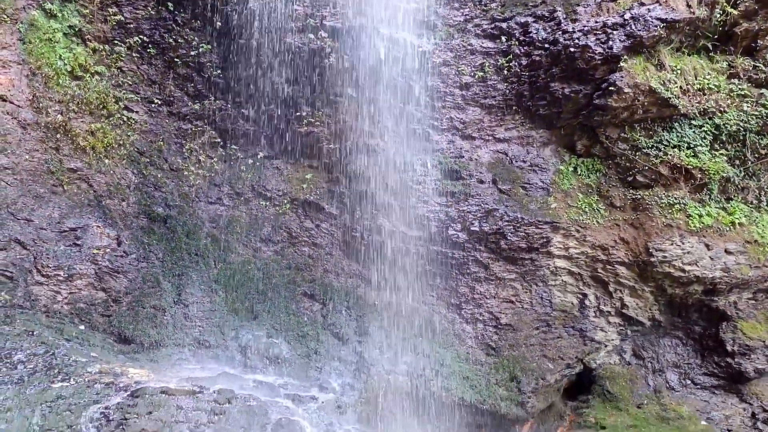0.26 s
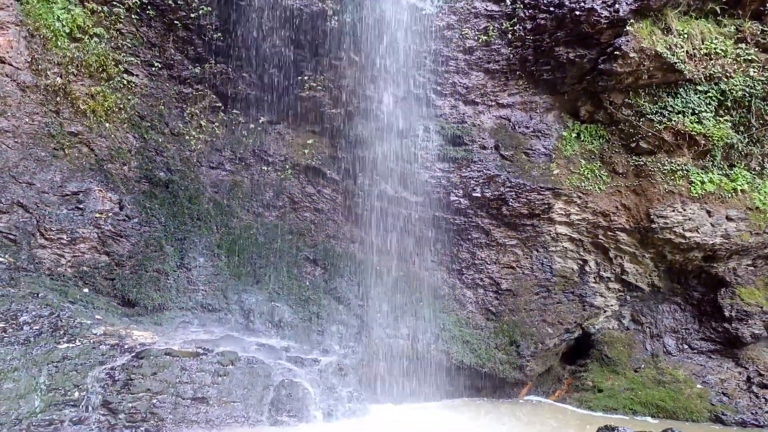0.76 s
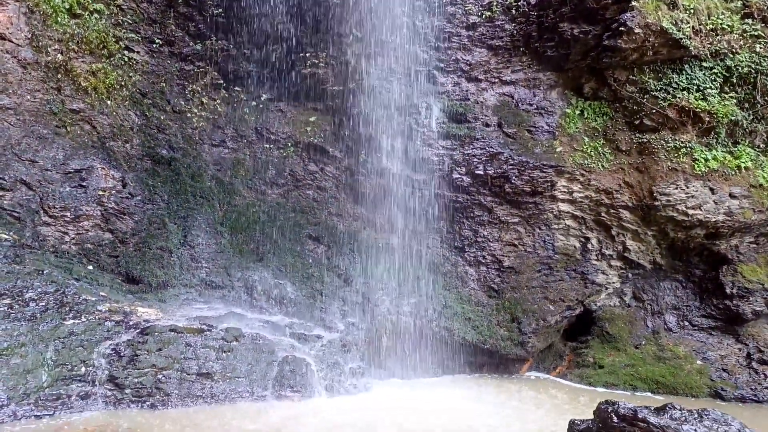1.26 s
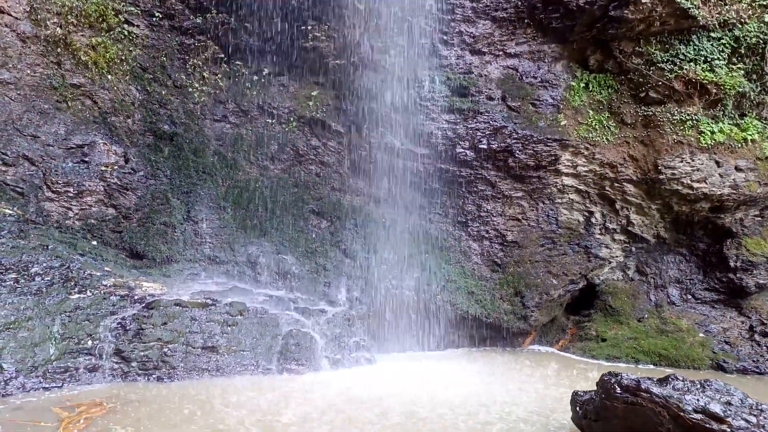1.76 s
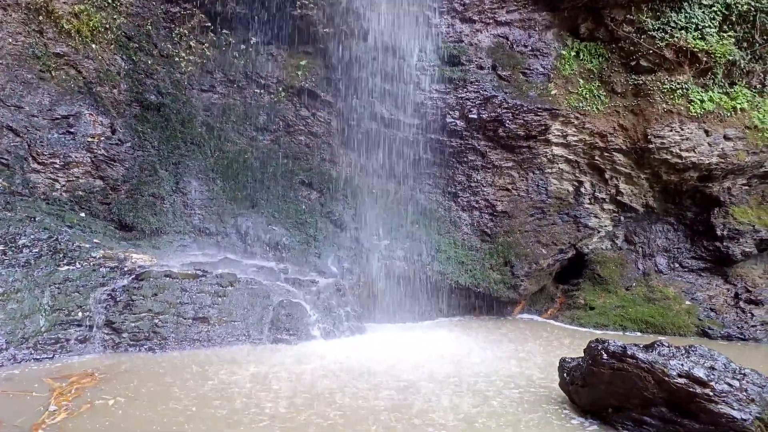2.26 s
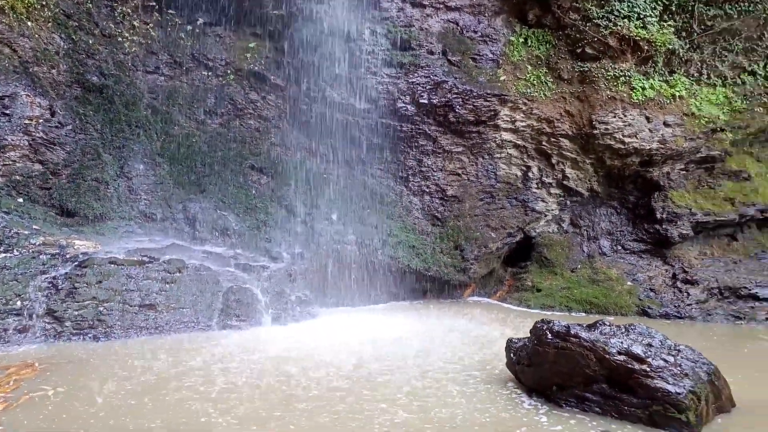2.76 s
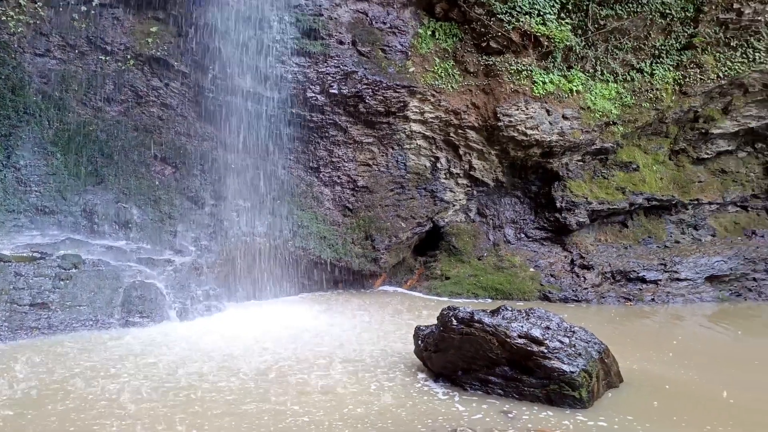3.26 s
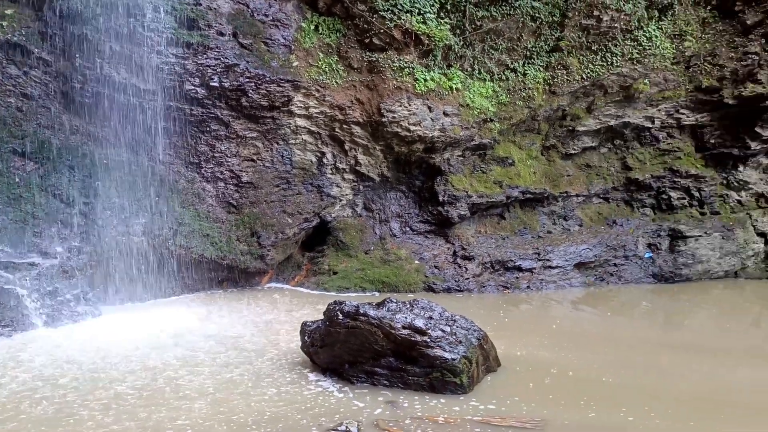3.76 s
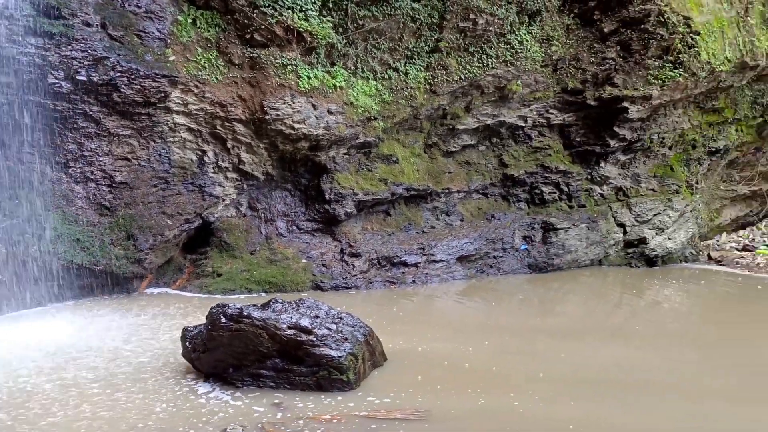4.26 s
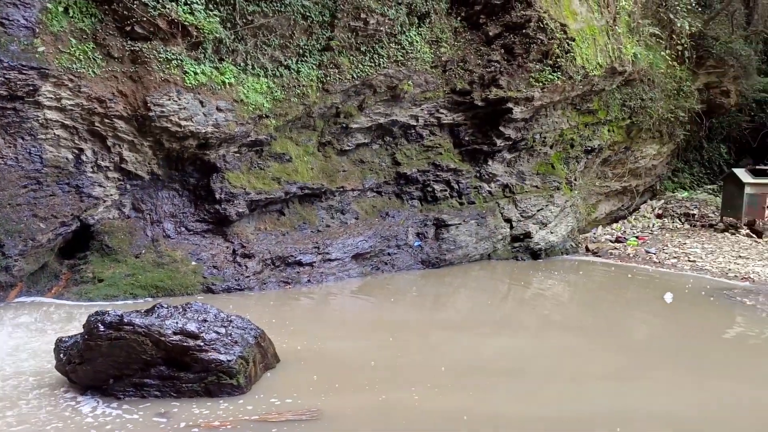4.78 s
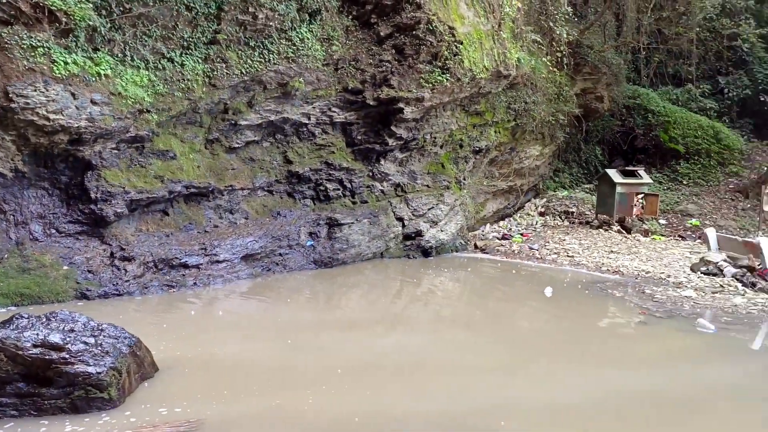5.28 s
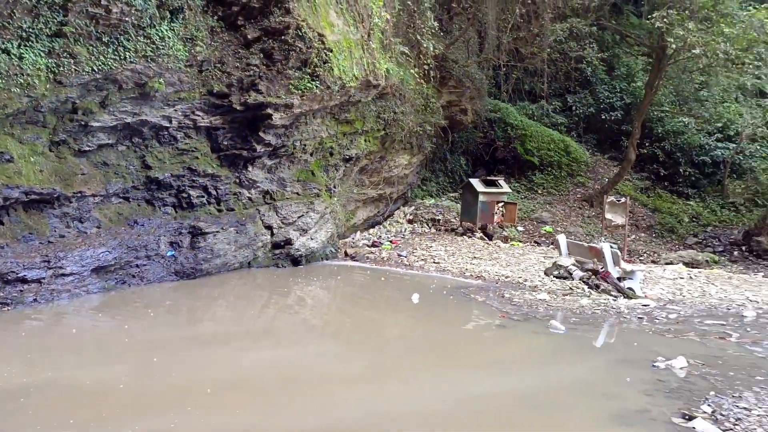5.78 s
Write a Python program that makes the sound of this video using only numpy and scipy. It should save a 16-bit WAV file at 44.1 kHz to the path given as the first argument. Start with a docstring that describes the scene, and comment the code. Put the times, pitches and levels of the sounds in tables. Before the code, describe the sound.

Steady rush of water from the first moment to the last, with no pause. Countless drops patter on stone and water, bright fizzing spray on top, a churning plunge beneath. The flow ripples slightly with brief heavier sheets and occasional hollow plops. Midway a faint low air buffet passes; toward the end the spray is slightly duller and weaker. Close hand-held mono microphone, outdoors, dry sound.

```python
"""Tall thin waterfall, close up

A tall thin waterfall showers onto rock and into a pool, close to a hand-held mono microphone.
Plunging clumps, splashes and fine spray are random impacts mixed with ringing air bubbles; slaps
knock and air pockets gurgle. The spray weakens and changes colour as the microphone turns away.
The recorder's moving low cut and uneven treble alter the water; a light draught is low noise."""
import sys
import numpy as np
from scipy import signal
from scipy.fft import rfft, irfft
from scipy.io import wavfile
from scipy.ndimage import uniform_filter1d

SR = 44100
rng = np.random.default_rng(int(sys.argv[2]) if len(sys.argv) > 2 else 0)


def generate_wav(signal):
    """Clip the signal to [-1, 1] and save it as 16-bit WAV at the path in sys.argv[1]."""
    frames = np.transpose(np.atleast_2d(signal))
    scaled = np.clip(frames, -1, 1) * 32767
    pcm = np.round(scaled).astype(np.int16)
    wavfile.write(sys.argv[1], SR, pcm)


N = 265834
TIME = np.arange(N) / SR


def gain_of(db):
    """Turns decibels into a gain."""
    return 10 ** (np.asarray(db) / 20)


def evened(x):
    """Scales a sound to rms 1."""
    return x / np.sqrt(np.mean(x ** 2) + 1e-20)


def add(mix, s, sound):
    """Lays a sound into the mix, starting at time s in seconds."""
    part = mix[max(round(s * SR), 0):][:len(sound)]
    part += sound[:len(part)]


def follow(rows, t=TIME):
    """Reads each column of a curve table at the times t, with straight lines between rows."""
    s, *columns = np.transpose(rows)
    return np.array([np.interp(t, s, column) for column in columns])


def coloured(x, points):
    """Gives x a spectrum from a table, falling steeply beyond the table's ends; rms 1."""
    octave = np.log2(np.fft.rfftfreq(2 * N, 1 / SR) + 1)
    hz, db = np.transpose(points)
    known = np.log2(hz)
    beyond = abs(octave - np.clip(octave, known[0], known[-1]))
    shape = gain_of(np.interp(octave, known, db) - 48 * beyond)  # falls 48 dB more per octave
    return evened(irfft(rfft(x, 2 * N) * shape)[:N])


def low_cut(x, hz):
    """Weakens what lies below hz, without delay."""
    sos = signal.butter(3, hz, "highpass", fs=SR, output="sos")
    return signal.sosfiltfilt(sos, x)


def swept(x, rule, size=1024):
    """A moving filter: splits x into short spectra and scales them by rule(hz, t)."""
    overlap = size - size // 4
    hz, t, spectra = signal.stft(x, SR, nperseg=size, noverlap=overlap)
    shaped = spectra * rule(hz[:, None] + 1, t)
    return signal.istft(shaped, SR, nperseg=size, noverlap=overlap)[1][:N]


def swell(middle, length, t=TIME):
    """A smooth rise to 1 and an equal fall, length seconds in all."""
    return np.cos(np.pi * np.clip((t - middle) / length, -.5, .5)) ** 0.96


def flutter(rate_hz):
    """Slow random wavering of rms 1, with little above the given rate."""
    hz = np.fft.rfftfreq(N, 1 / SR)
    weight = hz / (hz + 2) / (1 + (hz / rate_hz) ** 2)
    return evened(irfft(rfft(rng.standard_normal(N)) * weight, N))


def impacts(per_s, spread_db):
    """Drops strike at random times as single clicks, many small and a few large; rms 1."""
    size = gain_of(spread_db * np.minimum(rng.exponential(1, N), 4))
    sign = rng.choice([-1, 1], N)
    struck = rng.random(N) < per_s / SR
    return evened(size * sign * struck)


def bubble(hz, cycles, rise):
    """A trapped pocket of air rings, dies away and rises in pitch as it nears the surface."""
    # age 1 is the time in which the ringing falls to 1/e, lasting the given cycles
    age = np.arange(int(2 * np.pi * cycles / hz * SR)) * hz / SR / cycles
    tone = np.sin(2 * np.pi * cycles * (age + rise * age ** 2 / 2))
    return tone * np.exp(-age) * (1 - np.exp(-10 * age))


def bubbles(low_hz, high_hz, cycles, rise, spread_db, count):
    """Bubbles ring at random times and pitches; spread_db sets how their strengths vary; rms 1."""
    out = np.zeros(N)
    for when, smallness, chance in rng.random((count, 3)):
        hz = low_hz * (high_hz / low_hz) ** smallness
        strength = gain_of(-spread_db * np.log(chance + .02))
        add(out, when * N / SR, strength * bubble(hz, cycles, rise))
    return evened(out)


# how far the microphone is turned away from the fall: t/s, turn (0 facing - 1 away)
MIC_TURN = [(0, 0.29), (1.2, 0.39), (2.4, 0.5), (3.2, 0.52), (4.2, 0.75), (6.03, 0.97)]


def turned(x, facing, away):
    """Blends two colours of the same sound as the microphone turns."""
    turn = np.clip(follow(MIC_TURN)[0], 0, 1)
    return (1 - turn) * coloured(x, facing) + turn * coloured(x, away)


RIPPLE_DB, RIPPLE_HZ = 0.29, 8.6  # small chance changes of the flow (rms), and how fast they come
# heavier sheets of water in the flow: middle t/s, length/s, swell level/dB
HEAVY_SHEETS = [(0.24, 0.15, 2), (0.763, 0.39, 2), (1.048, .2, 2), (1.414, 0.11, 2.5), (1.5, 0.099, 3.5),
                (1.573, 0.088, 2), (1.705, 0.063, 2.5), (1.84, 0.088, 4.5), (2.27, 0.2, 1.8),
                (2.464, 0.074, 2.5), (2.744, 0.15, 1.5), (3.177, 0.085, 2.5), (3.4, 0.37, 2),
                (3.674, 0.32, 2.5), (3.856, 0.061, 5.5), (4.18, 0.087, 2.5), (4.39, 0.072, 2),
                (4.52, 0.088, 2.5), (5.465, 0.036, 2)]


def flow():
    """Swell of the falling water in dB: heavier sheets over a slight ripple."""
    sheets = sum(db * swell(s, length) for s, length, db in HEAVY_SHEETS)
    return sheets + RIPPLE_DB * flutter(rate_hz=RIPPLE_HZ)


# colour of the plunge into the pool: f/Hz, relative level/dB (per Hz)
PLUNGE_COLOUR = [(100, -7), (170, 1), (210, 1.5), (255, 3), (310, 2), (350, -3), (410, 1.5), (470, -1),
                 (550, 3.5), (650, 1.5), (750, 3), (870, -1), (1100, -11.5), (1800, -51)]


def plunge(level_db):
    """Clumps of water punch the pool and trap large, quickly damped bubbles."""
    gulps = bubbles(low_hz=332.8, high_hz=907, cycles=3.03, rise=0.072, spread_db=1.0, count=2400)
    churn = impacts(per_s=9000, spread_db=1.0)
    return coloured(churn + gain_of(-13.0) * gulps, PLUNGE_COLOUR) * gain_of(level_db)


LOW_CUT_HZ = 394  # resting edge of the recorder's low cut
WAVER_HZ, WAVER_RATE_HZ = 15.7, 10  # chance wavering of that edge (rms), and how fast it comes
# the low cut moves up (thinner roar) or down (deeper roar): middle t/s, length/s, shift f/Hz
LOW_CUT_SHIFTS = [(0.645, 0.15, 57), (0.905, 0.12, -42), (1.352, 0.27, 144), (1.537, 0.056, -56),
                  (1.765, 0.29, 86), (2.211, 0.29, 99), (2.506, 0.25, 115), (2.685, 0.079, -63),
                  (3.07, 0.16, 83), (3.42, 0.051, -52), (3.942, 0.21, 98), (4.067, 0.058, -125),
                  (4.45, 0.16, 40), (5.25, 0.24, -62), (5.681, 0.14, 120)]


def moving_low_cut(hz, t):
    """The recorder's low cut on the roar: steep and wavering, with a faint skirt below."""
    waver = WAVER_HZ * np.interp(t, TIME, flutter(rate_hz=WAVER_RATE_HZ))
    shifts = sum(shift * swell(s, length, t) for s, length, shift in LOW_CUT_SHIFTS)
    below = (LOW_CUT_HZ + waver + shifts) / hz
    steep = 1 / np.sqrt(1 + below ** 36)
    skirt = gain_of(-15.0) / np.sqrt(1 + below ** 5.1)
    return np.hypot(steep, skirt)


# colour of the splash, microphone facing the fall: f/Hz, relative level/dB (per Hz)
SPLASH_COLOUR_FACING = [(450, -7), (680, 4.5), (900, -6), (1100, -3.5), (1400, 2), (1730, 1), (1900, -1),
                        (2100, -2), (2500, -7), (3300, -69), (5000, -52)]
# the same, microphone turned away: f/Hz, relative level/dB (per Hz)
SPLASH_COLOUR_AWAY = [(450, -50), (680, -2.5), (900, -0.5), (1100, 1), (1400, -1), (1730, -0.5), (1900, -6),
                      (2100, -9), (2500, -10.5), (3300, -30), (5000, -34)]


def splash(level_db, ticks):
    """Big drops patter on wet rock and water, with small ringing bubbles among them."""
    patter = impacts(per_s=7000, spread_db=1.0) + ticks
    plinks = bubbles(low_hz=850.0, high_hz=2118, cycles=8.3, rise=0.025, spread_db=0.0, count=2500)
    drops = patter + gain_of(-17.5) * plinks
    return turned(drops, SPLASH_COLOUR_FACING, SPLASH_COLOUR_AWAY) * gain_of(level_db)


PIP_DB = -19.5  # single drops that stand out, against the spray's impacts
MIST_DRIFT_DB = 1.16  # the finest mist drifts on the air (rms)
# colour of the spray, microphone facing the fall: f/Hz, relative level/dB (per Hz)
SPRAY_COLOUR_FACING = [(2000, -32), (2600, -7), (3000, -1), (3500, 1), (4000, 2.5), (4600, -2), (5400, -6),
                       (6000, -16), (6700, -18), (7050, -26), (7450, -15.5), (8000, -25), (9000, -53)]
# the same, microphone turned away: f/Hz, relative level/dB (per Hz)
SPRAY_COLOUR_AWAY = [(2000, -26), (2650, -0.5), (3100, 1), (3900, 1), (4450, 3), (5000, 1.5), (5600, -0.5),
                     (6100, -4.5), (6700, -14), (7050, -11.5), (7450, -9.5), (8000, -19), (9000, -42)]
# colour of the finest mist: f/Hz, relative level/dB (per Hz)
MIST_COLOUR = [(6500, -24), (8000, 1.5), (8800, 1), (9900, 0.5), (11300, -3.5), (12500, -10), (13800, -19),
               (14500, -14), (15100, -12), (15700, -21)]


def spray(level_db, mist_db, ticks):
    """Fine drops burst on stone in slight gusts; turned away, the hiss spreads wider in pitch."""
    gusts_db = 0.21 * flutter(rate_hz=11)
    fizz = bubbles(low_hz=2430, high_hz=8120, cycles=16.4, rise=0.0443, spread_db=-1.5, count=4000)
    pips = bubbles(low_hz=3000, high_hz=6200, cycles=3, rise=0.04, spread_db=1.0, count=420)
    drops = impacts(per_s=13000, spread_db=2.0) + ticks
    drops = drops + gain_of(-18.5) * fizz + gain_of(PIP_DB) * pips
    hiss = turned(drops, SPRAY_COLOUR_FACING, SPRAY_COLOUR_AWAY) * gain_of(level_db)
    drift_db = MIST_DRIFT_DB * flutter(rate_hz=5.8)
    mist = coloured(impacts(per_s=16000, spread_db=3.0), MIST_COLOUR) * gain_of(mist_db + drift_db)
    return (hiss + mist) * gain_of(gusts_db)


def patches(shape, size):
    """Smooth random field of rms 1; size is the smoothing width in (bins, frames)."""
    field = rng.standard_normal(shape)
    for axis in (0, 1, 0, 1):
        field = uniform_filter1d(field, size[axis], axis, mode="wrap")
    return evened(field)


# how strongly the uneven patches act at each pitch: f/Hz, level/dB (per unit of the field)
PATCH_DEPTH = [(1700, 0), (2300, 3.3), (2900, 1.4), (4000, 1.3), (5400, 1.3), (6400, 4.1), (8200, 4.1),
               (9000, 3.6), (11000, 3.4), (12500, 1.8), (15500, 1.0)]


def uneven_treble(hz, t):
    """The recorder's processing makes the treble uneven in small random patches, brief or lingering."""
    shape = len(hz), len(t)
    field = patches(shape, size=(4, 4)) + 0.53 * patches(shape, size=(3, 70))
    # neighbouring patches trade level, so the whole stays steady
    field = field - uniform_filter1d(field, size=31, axis=0)
    # dips may go deep, but no patch stands out as a whistle
    field = np.minimum(field, 1.5)
    depth_db = np.interp(hz, *np.transpose(PATCH_DEPTH))
    top = 1 / (1 + (12000 / hz) ** 30)  # 0 below 12 kHz, 1 above
    flicker_db = 1.5 * top * patches(shape, size=(90, 5))  # the very top flickers
    return gain_of(depth_db * field + flicker_db)


def bump(rows, hz, t):
    """A moving bell on the spectrum, in dB."""
    centre, width, db = follow(rows, t)
    return db * np.exp(-((hz - centre) / width) ** 2)


# The crests and hollows drift as the microphone moves; a negative level turns one into the other.
# broad crest in the hiss: t/s, centre f/Hz, width f/Hz, height level/dB
BROAD_CREST = [(0, 3800, 400, -1.5), (1.0, 3730, 380, 1), (1.7, 3880, 350, 3), (2.2, 4070, 300, 3.5),
               (2.8, 4130, 350, 3), (3.4, 4100, 350, 0.7), (4.0, 3900, 350, 0), (4.8, 4000, 350, -0.5),
               (5.4, 3970, 350, 0.5), (6.03, 3980, 350, 2.5)]
# bright ridge high in the hiss: t/s, centre f/Hz, width f/Hz, height level/dB
HIGH_RIDGE = [(0, 7400, 300, -0.5), (.5, 7400, 300, -1), (1.5, 7400, 350, -.5), (2.7, 7600, 350, 1.5),
              (3.9, 7500, 350, -0.5), (4.2, 7400, 350, 3.5), (4.9, 7400, 350, 2.5), (5.3, 7500, 350, -2.5),
              (6.03, 7750, 250, -7)]
# narrow notch beside the low hollow: t/s, centre f/Hz, width f/Hz, depth level/dB
SIDE_NOTCH = [(1.4, 2150, 100, 4), (1.75, 2220, 120, 6), (2.05, 2100, 110, 4), (2.35, 2130, 130, 7),
              (2.7, 2150, 130, 4), (3.1, 2110, 130, 6.5), (3.6, 2100, 100, 5), (4.2, 2100, 100, 3)]
# low hollow in the hiss: t/s, centre f/Hz, width f/Hz, depth level/dB
LOW_DIP = [(0, 2750, 150, 3), (.45, 2630, 110, 0), (.7, 2630, 100, 6), (1.0, 2560, 115, 13),
           (1.35, 2590, 100, 12), (1.55, 2550, 110, 3), (1.75, 2600, 110, 10), (1.9, 2580, 100, 8),
           (1.96, 2480, 150, 19), (2.04, 2430, 160, 17), (2.12, 2500, 200, 3), (2.35, 2580, 170, 9),
           (2.55, 2550, 200, 7), (2.75, 2500, 250, 8), (3.0, 2620, 200, 8), (3.2, 2450, 200, 5),
           (3.4, 2550, 200, 7), (3.55, 2300, 230, 7), (3.8, 2350, 220, 1.5), (4.2, 2290, 200, 3),
           (4.85, 2400, 200, 4), (5.08, 2320, 130, 7), (5.4, 2400, 170, 2.5), (6.03, 2750, 300, 4)]
# high hollow in the hiss: t/s, centre f/Hz, width f/Hz, depth level/dB
HIGH_DIP = [(0, 6600, 300, 1), (.35, 6550, 280, 8), (1.05, 6450, 200, 2.4), (1.42, 6470, 220, 11),
            (1.75, 6100, 300, 1), (1.85, 5990, 190, 4), (2.5, 6080, 190, 4.8), (3.2, 6240, 150, 2),
            (4.1, 6750, 160, 5.1), (4.45, 6650, 200, 1), (5.2, 6800, 180, 5), (5.5, 6450, 250, 1),
            (6.03, 6300, 300, 3)]
# topmost hollow in the hiss: t/s, centre f/Hz, width f/Hz, depth level/dB
TOP_DIP = [(0, 8200, 250, 5), (2.0, 8250, 250, 3), (2.72, 8300, 250, .3), (2.86, 8350, 290, 8),
           (4.1, 8250, 290, 4), (5.3, 8400, 300, 3), (5.5, 8400, 300, -4), (6.03, 8300, 300, -3)]


def wandering_colour(hz, t):
    """Hollows and crests drift through the hiss as the microphone moves."""
    crests = sum(bump(crest, hz, t) for crest in (BROAD_CREST, HIGH_RIDGE))
    hollows = sum(bump(hollow, hz, t) for hollow in (SIDE_NOTCH, LOW_DIP, HIGH_DIP, TOP_DIP))
    return gain_of(crests - hollows)


PUFF_OCTAVES = .42  # half the width of a puff's band


def puff(length, db, hz):
    """One eddy buffets the microphone as a swell of low noise: a smaller eddy thuds higher."""
    band_hz = hz * 2 ** (PUFF_OCTAVES * np.array([-1, 1]))
    sos = signal.butter(2, band_hz, "bandpass", fs=SR, output="sos")
    air = signal.sosfilt(sos, rng.standard_normal(SR))[-int(length * SR):]
    shape = swell(length / 2, length, np.arange(len(air)) / SR)
    return gain_of(db) * evened(air * shape) / np.sqrt(2)


CALM_DB, CALM_SWING_DB = -95.5, 3  # faint air between the puffs, and its random swing (rms)
# colour of the faint air: f/Hz, relative level/dB (per Hz)
CALM_AIR_COLOUR = [(20, -17), (38, -17), (55, -8), (78, 0), (92, 3), (105, 6), (135, 6), (200, -13),
                   (320, -35)]
# puffs of air on the microphone: middle t/s, length/s, level/dB, middle of band f/Hz
AIR_PUFFS = [(.19, .16, -89, 70), (.86, .1, -88, 85), (2.36, 0.17, -82, 70), (2.53, 0.12, -76, 75),
             (2.618, .08, -77, 68), (2.673, .07, -75.5, 70), (2.76, .09, -82, 80), (3.012, .09, -81, 80),
             (3.224, 0.12, -76.5, 90), (3.5, .14, -80, 62), (3.568, 0.1, -67.5, 75), (3.625, .1, -72, 95),
             (3.68, 0.1, -64.5, 112), (3.727, .06, -67, 145), (3.84, .18, -86, 90), (4.19, .18, -81.5, 85),
             (4.81, 0.093, -78, 90), (4.875, .11, -73, 80), (5.517, 0.08, -78, 105)]


def draught():
    """Puffs of moving air swell and fade on the microphone, over faint steady-coloured air."""
    calm_db = CALM_DB + CALM_SWING_DB * flutter(rate_hz=5.1)
    calm = coloured(rng.standard_normal(N), CALM_AIR_COLOUR) * gain_of(calm_db)
    puffs = np.zeros(N)
    for s, length, db, hz in AIR_PUFFS:
        add(puffs, s - length / 2, puff(length, db, hz))
    return calm + low_cut(puffs, hz=42)


# deep gurgles of large air pockets in the pool: start t/s, level/dB, starting pitch f/Hz
AIR_POCKETS = [(0.108, -39, 385), (0.854, -45.5, 320), (0.926, -43, 385), (1.525, -45, 335),
               (2.665, -37, 393), (4.07, -45, 345), (5.19, -45, 358)]


def gurgles():
    """Large air pockets ring longer and mostly lower than the other bubbles of the plunge."""
    out = np.zeros(N)
    for s, db, hz in AIR_POCKETS:
        add(out, s, gain_of(db) * bubble(hz, cycles=5.1, rise=0.034))
    return low_cut(out, hz=265)


SPLAT_DB, SPLAT_S = -18, 0.0074  # wet burst against its slap's level, and its time to peak and decay
# colour of the wet burst: f/Hz, relative level/dB (per Hz)
SPLAT_COLOUR = [(500, -1), (780, 0), (1100, -2), (1700, -9), (2400, -24), (4200, -14), (6000, -23)]
# slaps of water, strong and faint (hardly above the roar): start t/s, level/dB, starting pitch f/Hz
WATER_SLAPS = [(0.78, -28.5, 430), (1.489, -24.5, 508), (2.882, -32, 953), (3.167, -35, 627),
               (3.243, -28, 740), (3.735, -26, 680), (3.793, -32, 716), (3.856, -29, 480),
               (3.959, -30, 1250), (4.168, -30.5, 543), (4.345, -28, 600), (4.501, -33, 770),
               (4.672, -29, 1050), (5.158, -31.5, 530), (5.6, -25, 720)]


def slaps():
    """A clump of water splats and opens a cavity that gives one short, hollow knock."""
    out = np.zeros(N)
    wet = coloured(rng.standard_normal(N), SPLAT_COLOUR)
    for s, db, hz in WATER_SLAPS:
        age = np.clip((TIME - s) / SPLAT_S, 0, 20)
        burst = age * np.exp(1 - age)  # rises to 1 and dies away
        out += gain_of(db + SPLAT_DB) * wet * burst
        add(out, s, gain_of(db) * bubble(hz, cycles=3.5, rise=0.042))
    return out


PLUNGE_DB = -41.5  # the plunge at steady flow, before the moving filters
SPLASH_SHARE, SPRAY_SHARE = 0.51, 0.12  # how much of the flow's swell the lighter drops follow
TICKS_PER_S, TICKS_DB = 260, -14.5  # sharp ticks of the nearest drops, level against other impacts
# slow level of the splash as the microphone moves: t/s, level/dB
SPLASH_LEVELS = [(0, -38), (.17, -39.5), (.33, -40), (1.25, -40.5), (1.55, -41), (2.15, -40.5), (2.55, -40),
                 (3.0, -40), (3.8, -40), (4.8, -39), (5.4, -40.5), (6.03, -40)]
# slow level of the spray as the microphone moves: t/s, level/dB
SPRAY_LEVELS = [(0, -40.5), (.15, -40), (.32, -42), (.9, -42), (1.3, -43), (1.6, -41.5), (1.83, -41.5),
                (2.0, -42.5), (2.6, -43), (3.1, -43.5), (4.05, -44.5), (5.3, -44), (5.55, -44),
                (6.03, -44.5)]
# slow level of the mist as the microphone moves: t/s, level/dB
MIST_LEVELS = [(0, -62), (.35, -65.5), (1.3, -65.5), (1.8, -63), (2.55, -63), (3.1, -65.5), (3.6, -64.5),
               (4.2, -66.5), (6.03, -67)]


def scene():
    """One flow drives roar, splash and spray; near drops tick through the last two; equal channels."""
    flow_db = flow()
    ticks = gain_of(TICKS_DB) * impacts(TICKS_PER_S, spread_db=1.0)
    clumps = plunge(PLUNGE_DB + flow_db) + slaps()
    roar = swept(clumps, moving_low_cut, size=2048) + gurgles()
    splash_db = follow(SPLASH_LEVELS)[0] + SPLASH_SHARE * flow_db
    spray_db = follow(SPRAY_LEVELS)[0] + SPRAY_SHARE * flow_db
    patter = splash(splash_db, ticks)
    hiss = spray(spray_db, follow(MIST_LEVELS)[0], ticks)
    uneven = swept(roar + patter + hiss, uneven_treble)
    water = swept(uneven, wandering_colour, size=2048)
    mono = water + draught()
    return np.array([mono, mono])


TOP_EDGE_HZ = 15720  # highest pitch the recorder passes


def record(dry):
    """The recorder's band limit: a steep filter takes away the highest treble."""
    low_pass = signal.firwin(801, TOP_EDGE_HZ, window=("kaiser", 9), fs=SR)
    return signal.oaconvolve(dry, low_pass[None], "same")


dry = scene()
out = record(dry)
generate_wav(out)
```